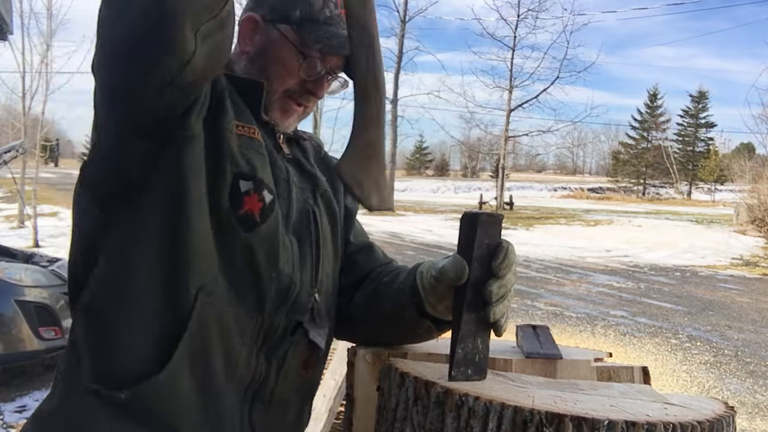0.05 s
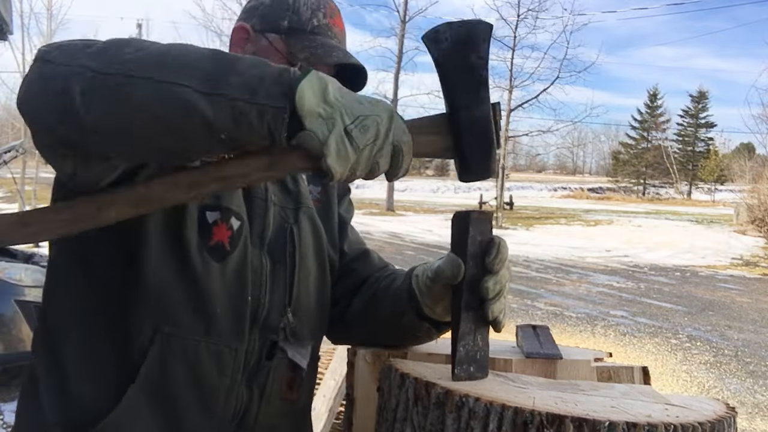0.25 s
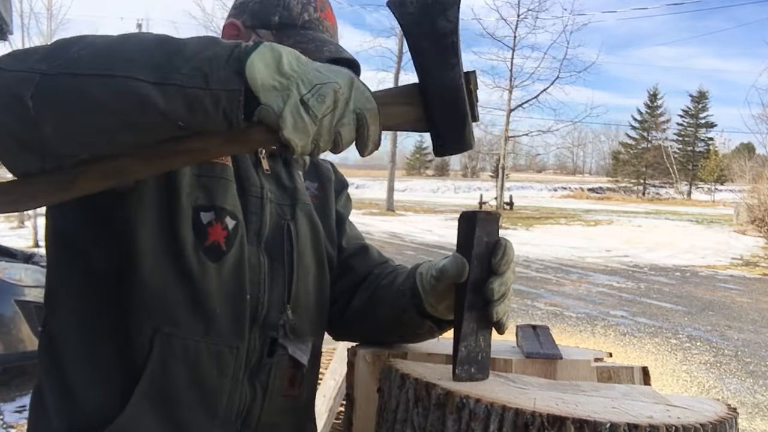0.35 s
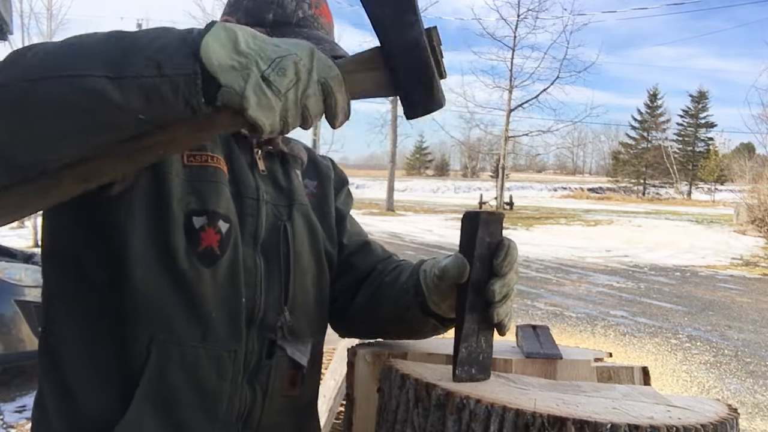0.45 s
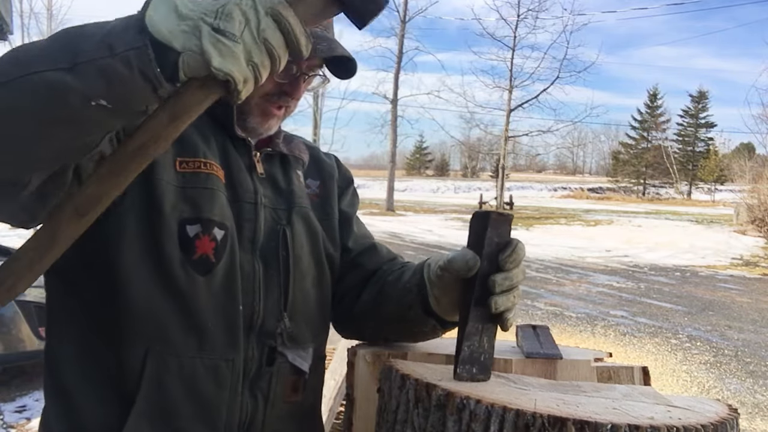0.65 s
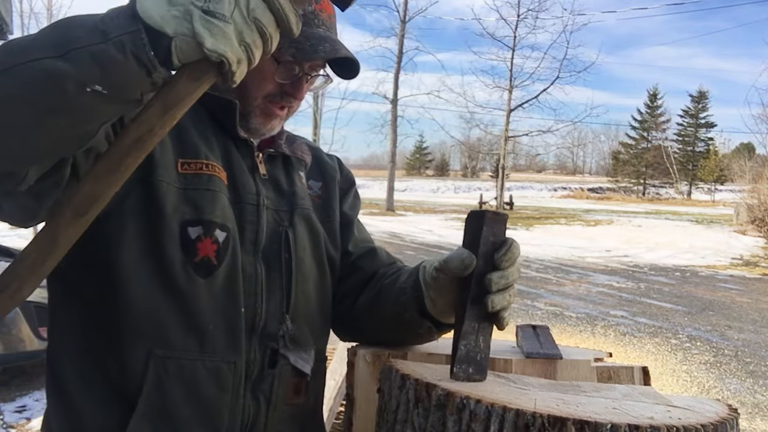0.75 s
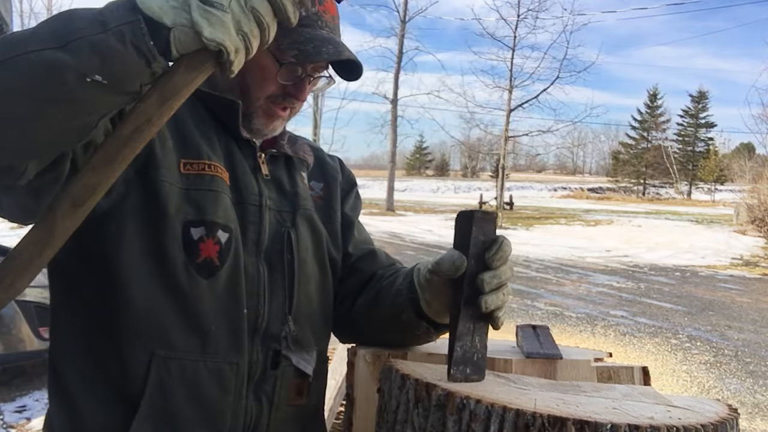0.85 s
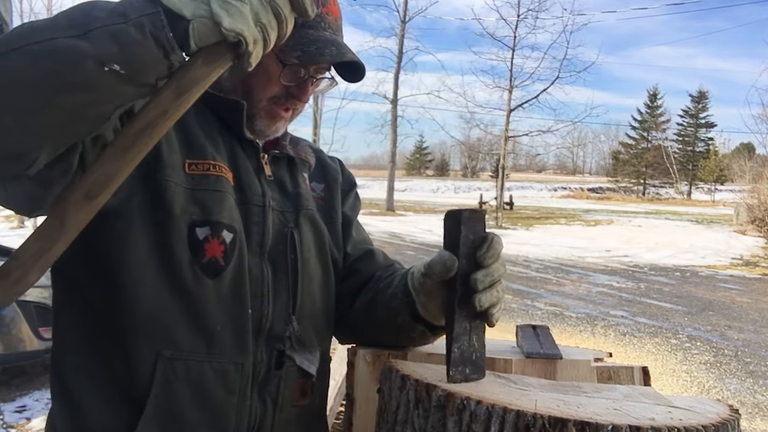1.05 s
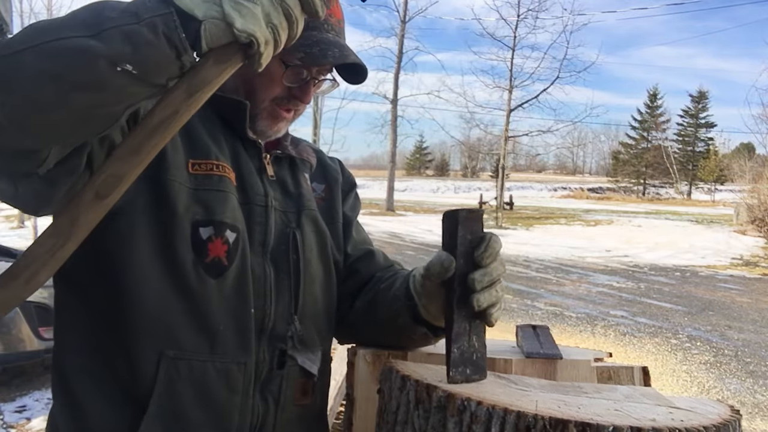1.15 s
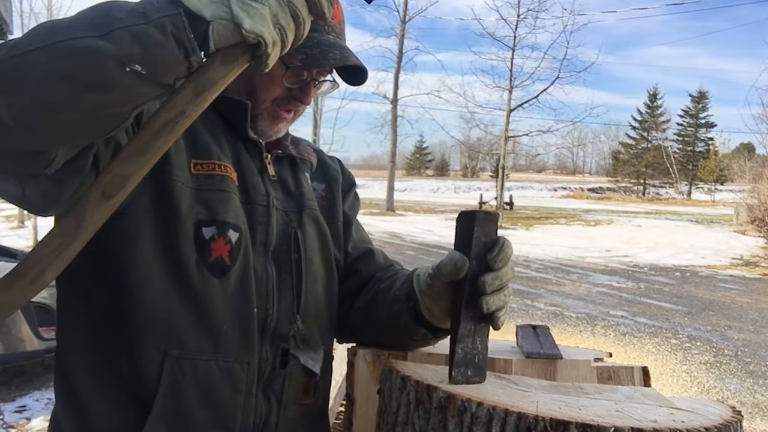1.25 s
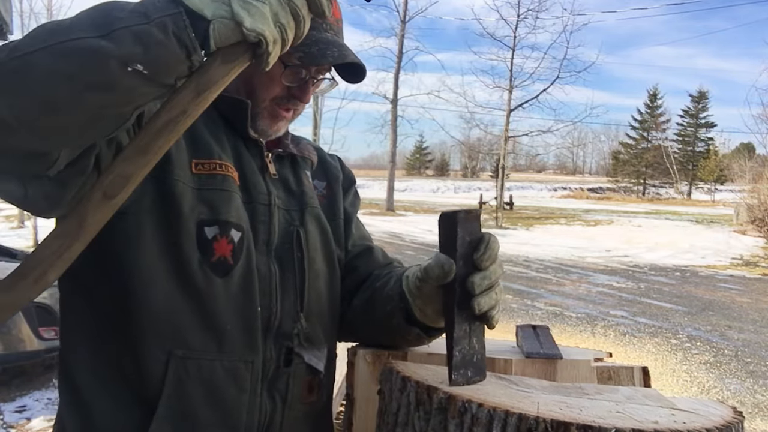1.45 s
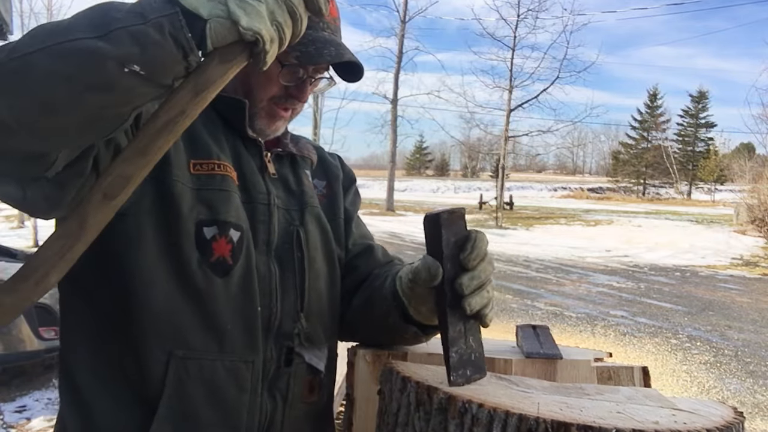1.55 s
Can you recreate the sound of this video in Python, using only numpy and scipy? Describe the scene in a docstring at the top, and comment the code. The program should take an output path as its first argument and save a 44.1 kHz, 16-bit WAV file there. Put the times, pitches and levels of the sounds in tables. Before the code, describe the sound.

One hard axe blow on a steel wedge, a short metallic clank with wooden knock, outdoors

```python
"""Axe blow on a steel wedge

Outdoors and close to the microphone, an axe head strikes a steel wedge that stands in a log end.
Shaped noise cracks and damped modes ring; a moment later the wedge bites and the modes of the log knock.
Noise tails scatter from the yard and echo from a distant tree line, where sine tones linger.
Filtered copies of the blow reflect; cloth grains and handling bumps sit faintly in open-air noise."""
import sys
import numpy as np
from scipy import signal
from scipy.fft import irfft
from scipy.io import wavfile

SR = 44100
rng = np.random.default_rng(int(sys.argv[2]) if len(sys.argv) > 2 else 0)


def transcribe(signal):
    """Save signal, clipped to [-1, 1], as a 16-bit WAV file at the path in sys.argv[1]."""
    frames = np.atleast_2d(signal).T
    limited = np.clip(frames, -1, 1)
    pcm = np.round(limited * 32767).astype(np.int16)
    wavfile.write(sys.argv[1], SR, pcm)


N = 70560  # samples, 1.6 s
BLOW_S = 0.2  # steel meets steel
BITE_S = BLOW_S + 0.0052  # the wedge drives into the wood


def undb(db):
    """Amplitude factor of a level in dB."""
    return 10 ** (np.asarray(db) / 20)


def since(start):
    """Seconds since start, zero before it."""
    return np.maximum(np.arange(N) / SR - start, 0)


def envelope(start, rise, t60):
    """A rounded rise (time constant in s), times a decay of 60 dB in t60 seconds."""
    t = since(start)
    return (1 - np.exp(-t / rise)) * np.exp(-np.log(1000) * t / t60)


def noise(gain):
    """Random-phase noise of rms 1 whose amplitude spectrum follows gain(Hz)."""
    f = np.arange(1, N // 2 + 2) * SR / N
    phase = 2 * np.pi * rng.random(len(f))
    x = irfft(gain(f) * np.exp(1j * phase), N)
    return x / x.std()


def coloured(points):
    """Noise of rms 1 shaped by (Hz, dB) points joined along log frequency."""
    hz, db = np.array(points).T
    return noise(lambda f: undb(np.interp(np.log(f), np.log(hz), db)))


def band(hz, width):
    """Noise of rms 1 in one resonance, as wide as width at half amplitude."""
    return noise(lambda f: 1 / (1 + np.square((f - hz) / width * 2)))


def ring(modes, start, rise):
    """Damped sine modes set going by one push."""
    out = np.zeros(N)
    for hz, db, t60 in modes:
        tone = np.sin(2 * np.pi * hz * since(start))
        out += undb(db) * envelope(start, rise, t60) * tone
    return out


# spectral shape of the open air: [f/Hz, relative level/dB per Hz]
AIR_SPECTRUM = [(20, -11), (52, 0.5), (85, -5), (130, -8.5), (220, -15.5), (420, -14), (700, -18.5),
                (1000, -16), (1700, -26), (2500, -22.5), (3300, -27.5), (4600, -40), (7000, -37),
                (10000, -43.5), (15000, -40.5)]


def open_air():
    """Steady noise of the quiet outdoors."""
    return undb(-66.5) * coloured(AIR_SPECTRUM)


# spectral shape of the cloth grains: [f/Hz, relative level/dB per Hz]
CLOTH_SPECTRUM = [(300, -16), (1500, -21), (2400, 8), (3300, 6), (4600, -10), (9000, -18.5)]


def cloth_rustle():
    """Jacket and glove crackle in randomly timed, decaying grains of uneven size as the axe is lifted."""
    grains_per_s, grain_decay_s, spread_db = 62, 0.0024, 2.5
    level_db, from_s = -83, 0.75
    hits = rng.random(N) < grains_per_s / SR
    grains = hits * undb(spread_db * rng.standard_normal(N))
    shape = signal.lfilter([1], [1, -np.exp(-1 / (grain_decay_s * SR))], grains)
    shape = shape / np.sqrt(np.mean(shape ** 2))
    return undb(level_db) * coloured(CLOTH_SPECTRUM) * shape * (since(from_s) > 0)


# faint handling noises: [t/s, f/Hz, width/Hz, level/dB, t60/s]
HANDLING_NOISES = [(0.792, 2820, 833.3, -50, 0.013), (0.793, 5093, 5000, -64, 0.016),
                   (1.259, 129, 150, -62.5, 0.054), (1.268, 440, 99, -63, 0.21)]


def handling():
    """Tiny ticks and soft bumps, short resonant noise bursts, while the axe is lifted again."""
    out = np.zeros(N)
    for start, hz, width, db, t60 in HANDLING_NOISES:
        out += undb(db) * band(hz, width) * envelope(start, 0.0008, t60)
    return out


def boom():
    """A narrow band of low noise that hangs after the blow."""
    return undb(-55) * band(53.3, 7.1) * envelope(BLOW_S, rise=0.02, t60=3.0)


# spectral shape of the tree echo: [f/Hz, relative level/dB per Hz]
TREES_SPECTRUM = [(100, 3), (220, -12), (420, -6.5), (700, -9), (1000, -5), (1350, -7.5), (1800, -17),
                  (2650, -8), (3200, -25), (4000, -24), (4700, -49), (9000, -60)]


def tree_echo():
    """The distant tree line returns a late, slowly fading wash of noise."""
    return undb(-53.5) * coloured(TREES_SPECTRUM) * envelope(0.3222, rise=0.062, t60=1.37)


# tones that linger in the echo: [f/Hz, level/dB, t60/s]
LINGERING_TONES = [(913, -57, 1.1), (950, -64, 1.2), (977, -64, 1.3), (1011, -57, 2.9), (1017, -62, 2.2),
                   (1022, -60, 1.8)]


def lingering_ring():
    """Close sine tones decay slowly in the echo, with a noisy haze around them."""
    start, rise = 0.38, 0.036  # s
    haze = undb(-58.5) * band(1011, 160) * envelope(start, rise, t60=2.2)
    return ring(LINGERING_TONES, start, rise) + haze


# spectral shape of the yard scatter: [f/Hz, relative level/dB per Hz]
YARD_SPECTRUM = [(40, -15.5), (110, -10.5), (240, -21.5), (340, -7.5), (560, -15.5), (800, -3.5),
                 (1030, 2.5), (1350, -3.5), (1850, -17), (2350, -7), (3000, -16.5), (3900, -25),
                 (4400, -40.5), (5300, -33.5), (7200, -36.5), (10000, -51), (15000, -57)]


def yard_scatter():
    """Ground, woodpile and yard scatter the blow into a quick noise tail."""
    return undb(-16.5) * coloured(YARD_SPECTRUM) * envelope(BLOW_S, rise=0.0068, t60=0.24)


# single reflections, near to far: [arrival t/s, level/dB re blow, lowest f/Hz, highest f/Hz]
SINGLE_REFLECTIONS = [(0.267, -22, 2940, 4300), (0.407, -43.5, 2626, 2675), (.484, -54.5, 915, 4260)]


def reflections(hit):
    """Single surfaces each send back one delayed band of the blow."""
    t = np.arange(N) / SR
    out = np.zeros(N)
    for arrival, db, low, high in SINGLE_REFLECTIONS:
        band_pass = signal.butter(3, [low, high], "band", fs=SR, output="sos")
        thin = signal.sosfilt(band_pass, hit)
        delay = arrival - BLOW_S
        out += undb(db) * np.interp(t - delay, t, thin, left=0)
    return out


# spectral shape of the zing: [f/Hz, relative level/dB per Hz]
ZING_SPECTRUM = [(60, -39.5), (250, -18), (700, -24.5), (1000, -12.5), (1700, -19.5), (2600, -17.5),
                 (3100, -2), (3800, -18), (4400, -40.5), (5200, -15.5), (6200, -28.5), (7200, -52.5)]


def zing():
    """Thin noise swells exponentially for a few milliseconds and stops at the blow."""
    swell_s = 0.005  # time constant
    ahead = BLOW_S - np.arange(N) / SR
    swell = np.exp(-np.abs(ahead) / swell_s) * (ahead > 0)
    return undb(-17) * coloured(ZING_SPECTRUM) * swell


# modes of the log: [f/Hz, level/dB, t60/s]
LOG_MODES = [(124.3, -14.5, .06), (157, -19, 0.057), (330.6, -25.5, .23), (357, -21, 0.12),
             (442.4, -5.5, 0.14), (453.8, -22, .21), (636, -27.5, .18), (704, -30.5, 0.29),
             (917, -24.5, .2)]


def log_knock():
    """The biting wedge pushes the log's modes into a knock."""
    return ring(LOG_MODES, BITE_S, rise=0.00089)


# modes of the wedge once it has bitten and the axe head has left it: [f/Hz, level/dB, t60/s]
WEDGE_MODES = [(2640, -16.5, .125), (2651, -17, 0.14), (2722, -31, 0.11), (11150, -49, .18),
               (11440, -25.5, .128)]


def wedge_ring():
    """The wedge rings freely from the bite on."""
    return ring(WEDGE_MODES, BITE_S, rise=0.001)


# modes of wedge and axe head: [f/Hz, level/dB, t60/s]
STEEL_MODES = [(972, -22, .15), (1039, -23.5, .24), (1062, -25.5, .24), (1144, -22.5, .12),
               (1293, -24, .16), (1341, -27, .2), (1631, -17.5, .08), (1877, -23.5, 0.06),
               (2238, -16, 0.066), (2288.3, -6, .033), (2585, -21.5, 0.13), (2787, -25, 0.083)]


def steel_clang():
    """The contact pushes the modes of wedge and axe head into a brief clang."""
    return ring(STEEL_MODES, BLOW_S, rise=0.00067)


# spectral shape of the contact crack: [f/Hz, relative level/dB per Hz]
CRACK_SPECTRUM = [(60, -32.5), (300, -14), (600, -17), (780, -24.5), (1000, -1), (1800, -5), (2400, -2),
                  (3700, -8), (4400, -29), (5100, -15.5), (7000, -17.5), (8200, -31), (13000, -27.5),
                  (15500, -41.5)]


def contact_crack():
    """A very short, wide snap of noise at first contact, with a longer coloured crack."""
    snap = undb(-15) * band(9000, 13000) * envelope(BLOW_S, rise=0.0003, t60=0.0056)
    crack = undb(-9.5) * coloured(CRACK_SPECTRUM) * envelope(BLOW_S, rise=0.0004, t60=0.043)
    return snap + crack


def scene():
    """Open air and small sounds, the echoes, and the blow in front."""
    hit = contact_crack() + steel_clang() + wedge_ring() + log_knock()
    background = open_air() + cloth_rustle() + handling()
    echoes = boom() + tree_echo() + lingering_ring() + yard_scatter() + reflections(hit)
    return (background + echoes + zing() + hit)[None]


def record(dry):
    """The recorder thins the deepest bass, rounds the loudest peaks and cuts the top."""
    low_cut_hz, ceiling, top_hz = 27, 0.73, 15400
    bass_cut = signal.butter(3, low_cut_hz, "high", fs=SR, output="sos")
    x = signal.sosfilt(bass_cut, dry)
    held = x / (1 + np.abs(x / ceiling) ** 6) ** (1 / 6)  # bends smoothly towards the ceiling
    top_cut = signal.ellip(10, 0.2, 80, top_hz, fs=SR, output="sos")  # 0.2 dB ripple, 80 dB stop
    return signal.sosfilt(top_cut, held)


dry = scene()
out = record(dry)
transcribe(out)
```